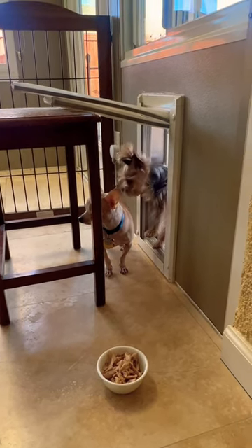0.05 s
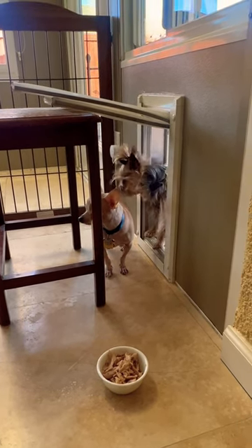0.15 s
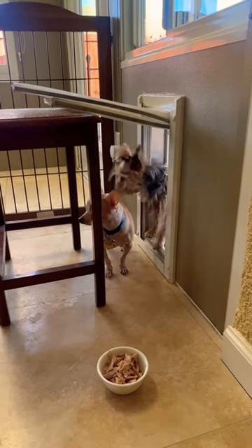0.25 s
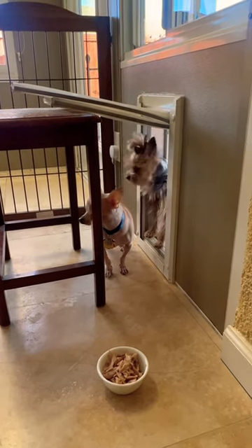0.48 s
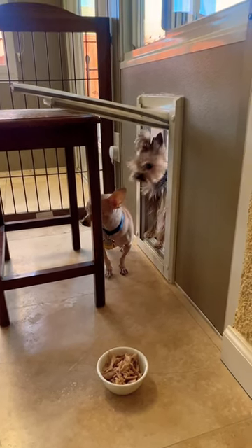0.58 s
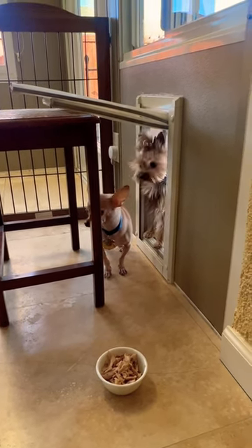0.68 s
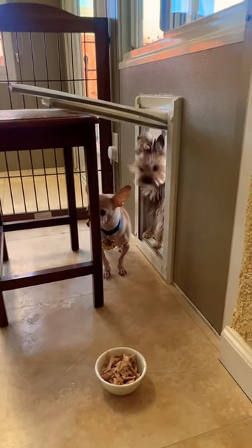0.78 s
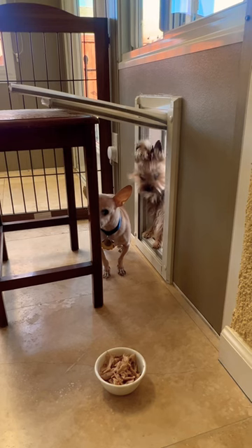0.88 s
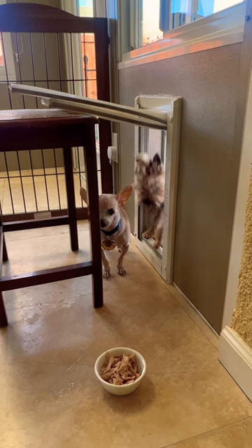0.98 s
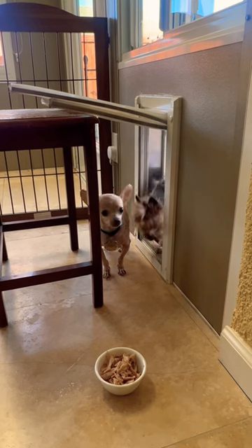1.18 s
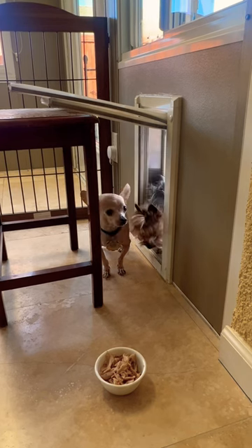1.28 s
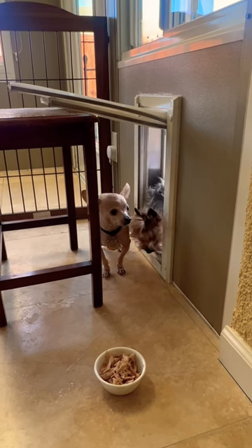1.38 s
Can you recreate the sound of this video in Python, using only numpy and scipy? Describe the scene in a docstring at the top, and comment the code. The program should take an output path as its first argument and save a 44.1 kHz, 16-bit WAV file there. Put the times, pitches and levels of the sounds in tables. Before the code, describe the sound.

One piercing small-dog yelp rings in a hard-floored room, followed by pet-door rustle and knocks

```python
"""Small dog's yelp and a pet door

A step from a phone in a hard-floored room, a claw ticks and a small dog yelps once: overtones of the fold pitch
rise like a whistle and slip into period doubling halfway; overload splatters in low noise. Later a plastic pet-
door flap is brushed and dragged over fur (coloured grains), knocked (ringing modes), its hinge squeaks and the
dog's collar tag rings (wavering tones). Filtered noise makes the room's answer and a low rumble with hiss."""
import sys
import numpy as np
from scipy import signal
from scipy.fft import rfft, irfft, next_fast_len
from scipy.io import wavfile
from scipy.ndimage import uniform_filter1d, map_coordinates

SR = 44100
rng = np.random.default_rng(int(sys.argv[2]) if len(sys.argv) > 2 else 0)


def digitize_waveform(pressure):
    """Quantize a signal to 16-bit integers and store it at the path in sys.argv[1].

    Rows of a 2-D input are taken as channels; values are limited to [-1, 1].
    """
    field = np.atleast_2d(pressure).T
    bounded = np.clip(field, -1, 1)
    quanta = np.round(bounded * 32767).astype(np.int16)
    wavfile.write(sys.argv[1], SR, quanta)


def volts_from_db(level):
    """Convert decibel levels to linear amplitude ratios."""
    exponent = np.asarray(level, float) / 20
    return 10 ** exponent


N = 63945  # length in samples


def unit(x):
    """Scales x to rms 1."""
    return x / np.sqrt(np.mean(x ** 2) + 1e-20)


def along(points, hz):
    """Reads (hz, value) points on a log frequency axis."""
    f, v = np.transpose(points)
    return np.interp(np.log(hz + 1), np.log(f + 1), v)


def curves(rows):
    """Gives one value per sample for each column after the time."""
    s, *cols = np.transpose(rows)
    return [np.interp(np.arange(N) / SR, s, c) for c in cols]


def wobble(rate):
    """A smooth random curve with rate knots a second."""
    knots = rng.standard_normal(int(N * rate / SR) + 4)
    return map_coordinates(knots, [np.arange(N) * rate / SR])


def filtered(x, response):
    """Multiplies the spectrum of x by a complex response of frequency."""
    m = next_fast_len(N + 8192)
    return irfft(rfft(x, m) * response(np.fft.rfftfreq(m, 1 / SR)), m)[..., :N]


def coloured(x, colour):
    """Filters x by a colour of (hz, level_db) points."""
    return filtered(x, lambda hz: volts_from_db(along(colour, hz)))


def spread(pair, alike, colour):
    """Mixes two unrelated signals until left and right are as alike as asked, and colours them."""
    def mid_side(hz):
        turn = np.arccos(np.clip(along(alike, hz), -1, 1)) / 2
        return volts_from_db(along(colour, hz)) * [np.cos(turn), np.sin(turn)]

    mid, side = filtered(pair, mid_side)
    return np.array([mid + side, mid - side])


def ports(x):
    """The two microphone ports hear one sound with different phase and strength."""
    # left over right: hz, balance_db
    port_balance = [(150, -3.5), (400, -1.5), (1400, 2), (2800, 2.4), (5600, 0.5), (9000, 0)]
    # how far the left port lags the right: hz, lag_rad
    port_lag = [(40, 0.05), (150, .4), (350, 0.37), (700, 1.2), (1400, .4), (2600, 1.1), (5000, 0.68),
                (8500, 0.82), (11200, 2), (12300, np.pi)]

    def half(hz):
        return volts_from_db(along(port_balance, hz) / 2) * np.exp(-.5j * along(port_lag, hz))

    return filtered(x, lambda hz: np.array([half(hz), 1 / half(hz)]))


def grains(colour):
    """Friction: sparse random slips of uneven size over steady noise, coloured; rms 1."""
    grains_per_s, spread_db = 740, 2
    slips = (rng.random(N) < grains_per_s / SR) * volts_from_db(spread_db * rng.exponential(size=N))
    mix = unit(slips * rng.standard_normal(N)) + 2.15 * rng.standard_normal(N)
    return unit(coloured(mix, colour))


def strikes(events, modes):
    """Each blow rings the modes anew, with slightly different strengths and wandering phases."""
    contact_s = .0004  # time constant of a blow's rise
    wander_rad = 1.1  # phase wander per sample, times pitch over sample rate
    out, t = np.zeros(N + SR), np.arange(SR // 2) / SR
    for s, db in events:
        ring = np.zeros(len(t))
        for hz, level, t60 in modes:
            decay = volts_from_db(level + rng.normal(0, 1.5) - 60 * t / t60)
            wander = np.cumsum(rng.normal(0, wander_rad * hz / SR, len(t)))
            ring += decay * np.sin(2 * np.pi * hz * t + wander)
        out[round(s * SR):][:len(t)] += volts_from_db(db) * ring * (1 - np.exp(-t / contact_s))
    return out[:N]


def background():
    """Low room rumble and a faint hiss, both noise, swell and sink together."""
    # shared swell: time_s, level_db
    swell = [(0.0, -64), (0.184, -59.5), (0.23, -80), (0.584, -78), (0.84, -63), (1.008, -60), (1.086, -54),
             (1.186, -59.5), (1.288, -56), (1.348, -58.5), (1.404, -55.5), (1.45, -63.5)]
    # rumble spectrum: hz, density_db (per Hz)
    rumble_colour = [(12, -42.5), (20, -9), (101, 0), (140, -7), (369, -14.5), (441, -31.5), (700, -28.5),
                     (1000, -60)]
    # left-right likeness of the rumble: hz, likeness (-1 to 1)
    rumble_alike = [(30, 1), (100, 0.93), (250, 1), (600, 0.29)]
    # hiss spectrum: hz, density_db (per Hz)
    hiss_colour = [(400, -9), (1500, -0.5), (4000, -3.5), (8000, -15.5), (15500, -26)]
    hiss_db = -18  # under the rumble
    level_db, = curves(swell)
    rumble = unit(spread(rng.standard_normal((2, N)), rumble_alike, rumble_colour))
    rumble = rumble * volts_from_db(.8 * wobble(14))
    hiss = unit(ports(coloured(rng.standard_normal(N), hiss_colour)))
    return volts_from_db(level_db) * (rumble + volts_from_db(hiss_db) * hiss)


def claw_tick():
    """A claw meets the hard floor and rings a few short, mostly high modes."""
    # ticks: time_s, level_db
    ticks = [(0.0895, -48)]
    # ringing modes: hz, level_db, t60_s
    claw = [(4000, 1, 0.035), (4500, -4, .025), (5800, -10.5, .03), (3250, -16, .03), (1446, -16.5, 0.018)]
    return strikes(ticks, claw)


def room(x):
    """The room's answer: decaying noise in which each frequency dies at its own speed."""
    # decay times: hz, t60_s
    decay = [(800, 0.36), (1200, .27), (1550, 0.46), (2400, 0.36), (4000, .39), (12000, .28)]
    # colour of the answer: hz, level_db
    room_colour = [(800, 7), (1200, -11), (1550, -4.5), (2450, -8), (3200, -5), (4000, -1), (5600, 5.5),
                   (12000, -5.5)]
    # left-right likeness: hz, likeness (-1 to 1)
    room_alike = [(300, 1), (700, .4), (1500, 0.48), (5000, 0.27), (9000, 0.46)]
    gap_s = 0.011  # before the answer starts
    hz, t, z = signal.stft(rng.standard_normal((2, N)), SR, nperseg=256)
    fading = z * volts_from_db(-60 * t / along(decay, hz)[:, None])
    pair = signal.istft(fading, SR, nperseg=256)[1][:, :N]
    tail = spread(pair / np.linalg.norm(pair[0]), room_alike, room_colour)
    late = np.pad(x, (round(gap_s * SR), 0))[None]
    return signal.fftconvolve(late, tail, axes=1)[:, :N]


def bark():
    """Fold overtones and lines halfway between, weighed by the throat; breath pulses with the folds."""
    # the yelp: time_s, pitch_hz, level_db, brightness_db (per octave), period_doubling_db, breathiness_db
    yelp = [(.15, 1314, -59.5, -24.5, -54, -10.5), (.157, 1343, -27, -20.5, -59.5, -14.5),
            (.16, 1378, -12, -7.5, -49.5, -30.5), (.164, 1201, -13, -6, -51.5, -35),
            (.168, 1200, -14, -1, -52.5, -37.5), (.174, 1202, -10, 1.5, -51, -39.5),
            (.182, 1264, -14.5, 3, -48, -38.5), (.19, 1330, -6, 1, -43, -39.5),
            (.2, 1436, -10.5, 0.5, -20, -41), (.216, 1435, -9, 0.5, -8.5, -41.5),
            (.226, 1513, -7, -1, -2.5, -34), (.236, 1600, -11.5, -2.5, -7, -23),
            (.242, 1608, -17, 0.5, -2, -27.5), (.258, 1577, -17, 1, -11.5, -16.5),
            (.267, 1560, -35, -28, -27.5, -16), (.274, 1546, -72.5, -2.5, -16.5, -19.5)]
    # throat and open mouth: hz, gain_db
    throat = [(500, -44), (760, -37), (1200, -2.5), (1600, -2), (2000, -34.5), (2290, -17.5), (2430, -1),
              (2690, -20), (2830, -9), (2960, -37), (3190, -7), (3450, -22), (3700, -11), (4030, -13.5),
              (4400, -24.5), (4620, -38.5), (4950, -21), (5370, -37.5), (5700, -24.5), (6050, -42.5),
              (6600, -31.5), (7150, -30), (7450, -39), (8000, -28.5), (8600, -36), (9100, -36.5),
              (9800, -45.5), (10800, -37.5), (11900, -72)]
    # colour of the halfway lines: hz, gain_db
    halfway = [(800, -4.5), (2150, 3.5), (2400, -17.5), (3600, -1), (5200, 7.5)]
    # breath noise ahead of the throat: hz, density_db (per Hz)
    breath_colour = [(400, -49.5), (600, -24), (1000, -9), (1500, -14.5), (1950, -33.5), (2400, -7),
                     (4000, -5), (5600, -3), (8000, -11), (11500, -16.5), (14000, -26), (15500, -90)]
    jitter, jitter_rate, shimmer_db = .0025, 150, 1.6  # share of pitch; knots a second; dB per octave
    turn_rad = 1  # phase step per line
    breath_shaped = .35  # share of the throat's dB that the breath takes on

    hz, db, bright_db, half_db, breath_db = curves(yelp)
    hz = hz * (1 + jitter * wobble(jitter_rate))
    phase = np.pi * np.cumsum(hz) / SR  # runs at half the fold pitch
    voice = np.zeros(N)
    for k in range(1, 19):  # even k: overtones; odd k: halfway lines
        line_hz = hz * k / 2
        octaves = max(np.log2(k / 2), 0)
        weight_db = along(throat, line_hz) + octaves * (bright_db + shimmer_db * wobble(140))
        if k % 2:
            weight_db = weight_db + half_db + along(halfway, line_hz)
        voice -= volts_from_db(weight_db) * np.cos(k * (phase + turn_rad))

    pulsing = rng.standard_normal(N) * (1 + np.cos(2 * phase))
    breath = unit(filtered(
        pulsing, lambda f: volts_from_db(along(breath_colour, f) + breath_shaped * along(throat, f))))
    return volts_from_db(db) * (db > -59) * (np.sqrt(2) * voice + volts_from_db(breath_db) * breath)


def splatter():
    """Overload splatter: two brief bursts of low noise where the loud bark distorts at the microphone."""
    # bursts: time_s, level_db
    burst_times = [(.179, -35), (0.192, -35)]
    # burst spectrum: hz, density_db (per Hz)
    splatter_colour = [(60, -31), (300, -21), (900, 1.5), (1800, -2.5), (2300, -31)]
    half_length_s = 0.0019
    t = np.arange(N) / SR
    bursts = sum(volts_from_db(db) * np.exp(-.5 * ((t - s) / half_length_s) ** 2) for s, db in burst_times)
    return bursts * unit(coloured(rng.standard_normal(N), splatter_colour))


def flap_brush():
    """A short brush against the frame: friction grains that swell and fade."""
    # the brush: time_s, level_db
    strokes = [(0.72, -85), (0.772, -73), (0.788, -96), (0.812, -50.5), (0.832, -48.5), (0.852, -64.5),
               (0.934, -67), (1.0, -92)]
    # brush spectrum: hz, density_db (per Hz)
    brush_colour = [(180, -28), (300, -10.5), (500, -16.5), (744, -4), (2070, -19), (2830, -3), (3020, -16),
                    (3940, -12), (5300, -25.5), (6500, -15), (8700, -29.5), (11100, -24), (15000, -43.5)]
    t = np.arange(N) / SR
    level_db, = curves(strokes)
    sounding = (t > strokes[0][0]) * (t < strokes[-1][0])
    return sounding * volts_from_db(level_db) * grains(brush_colour)


def flap_knocks():
    """The flap is knocked and its plastic rings in a few short modes."""
    # knocks: time_s, level_db
    knocks = [(.8125, -48.5), (1.1065, -42.5), (1.347, -31)]
    # ringing modes: hz, level_db, t60_s
    flap = [(855, -0.5, 0.013), (1054, 4, 0.0071), (1800, -7.5, 0.011), (3866, -8.5, 0.017)]
    return strikes(knocks, flap)


def shifting(x):
    """The flap's resonances come and go as it bends: patches of spectrum swell and fade; rms 1."""
    shift_db = 3  # rms
    z = signal.stft(x, nperseg=512)[2]
    field = uniform_filter1d(rng.standard_normal(z.shape), size=2, axis=0)
    field = uniform_filter1d(field, size=7, axis=1)
    return unit(signal.istft(z * volts_from_db(shift_db * unit(field)), nperseg=512)[1][:N])


def flap_drag():
    """The flap drags over the dog: friction grains as dull body, bright scrape and fur hiss."""
    # the drag: time_s, body_db, scrape_db, fur_db (the fur is lifted 4.5 dB below)
    strokes = [(1.01, -105, -104, -113), (1.03, -80, -85, -81.5), (1.064, -85, -73, -79),
               (1.092, -99, -99, -85.5), (1.11, -49, -66, -76.5), (1.134, -40.5, -55.5, -73),
               (1.15, -43.5, -49, -76), (1.174, -40, -57, -77), (1.184, -46.5, -55, -76),
               (1.202, -43.5, -56.5, -74), (1.224, -49.5, -59, -79), (1.238, -48, -59.5, -63.5),
               (1.264, -52, -57.5, -61), (1.29, -43, -53, -71), (1.312, -45, -56, -68),
               (1.334, -54, -54.5, -55.5), (1.348, -47.5, -50.5, -57), (1.36, -53, -46.5, -61),
               (1.372, -54, -60.5, -76), (1.45, -81.5, -80, -99)]
    # dull body spectrum: hz, density_db (per Hz)
    body_colour = [(120, -60), (200, -21), (300, -4.5), (406, -14), (540, 0.5), (680, -6), (950, -0.5),
                   (1150, -9), (1370, -15), (1620, -12), (1800, -36), (5720, -120)]
    # bright scrape spectrum: hz, density_db (per Hz)
    scrape_colour = [(1180, -34), (2000, -8.5), (2540, -11.5), (2920, -3.5), (3310, -22), (3850, -1),
                     (4200, -3.5), (4860, -19), (6330, -15.5), (6820, -39), (7310, -20.5), (14000, -88)]
    # fur hiss spectrum: hz, density_db (per Hz)
    fur_colour = [(5290, -28), (9000, -12.5), (9400, -33.5), (10400, 0), (11200, 0.5), (13000, -3),
                  (13100, -58)]
    body_db, scrape_db, fur_db = curves(strokes)
    body = volts_from_db(body_db) * shifting(grains(body_colour))
    scrape = volts_from_db(scrape_db + 0.9 * wobble(90)) * grains(scrape_colour)
    fur = volts_from_db(fur_db + 4.5 + 1.9 * wobble(50.34)) * grains(fur_colour)
    return (np.arange(N) / SR > strokes[0][0]) * (body + scrape + fur)


def squeak_and_tag():
    """A thin hinge squeak, then the dog's collar tag ringing: short whistles that waver in pitch and flutter in
    level."""
    # hinge squeak, then collar-tag rings: start_s, length_s, pitch_hz, level_db, waver (share of pitch)
    squeaks = [(1.027, 0.074, 3560, -70, .03), (1.355, .014, 3000, -52, .02), (1.361, .09, 3010, -63, .006)]
    edge_s, flutter_db = .004, 2
    t, out = np.arange(N) / SR, np.zeros(N)
    for s, length, hz, db, waver in squeaks:
        gate = np.clip(np.minimum(t - s, s + length - t) / edge_s, 0, 1)
        level = volts_from_db(db + flutter_db * wobble(60.7))
        phase = 2 * np.pi * np.cumsum(hz * (1 + waver * wobble(230))) / SR
        out += gate * level * np.sin(phase)
    return out


def scene():
    """Dog and pet door, direct and through the room, with dry splatter, over the background."""
    dog_room_db, door_room_db = -7.5, -13.5  # sends into the room
    dog = claw_tick() + bark()
    door = flap_brush() + flap_knocks() + flap_drag() + squeak_and_tag()
    wet = room(volts_from_db(dog_room_db) * dog + volts_from_db(door_room_db) * door)
    return ports(dog + splatter() + door + wet) + background()


def roll_off(x):
    """The treble ends steeply here."""
    return signal.sosfilt(signal.butter(12, 15770, fs=SR, output="sos"), x)


def record(dry):
    """A soft ceiling rounds off the peaks."""
    ceiling, knee = .97, 10  # of full scale; higher knee bends more sharply
    mix = dry / (1 + np.abs(dry / ceiling) ** knee) ** (1 / knee)
    return roll_off(mix)


dry = scene()
out = record(dry)
digitize_waveform(out)
```